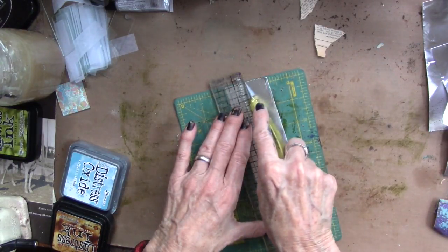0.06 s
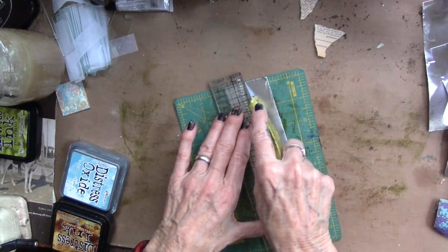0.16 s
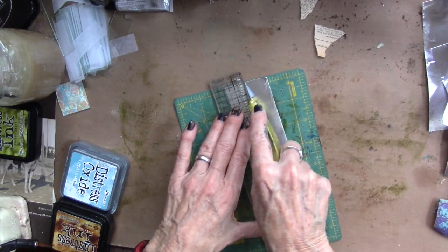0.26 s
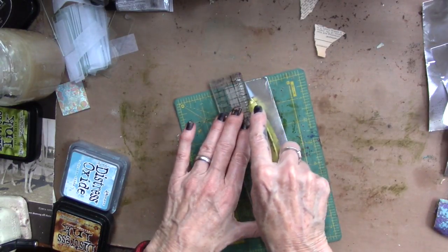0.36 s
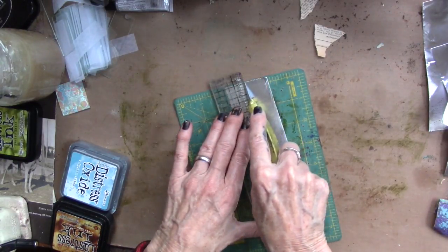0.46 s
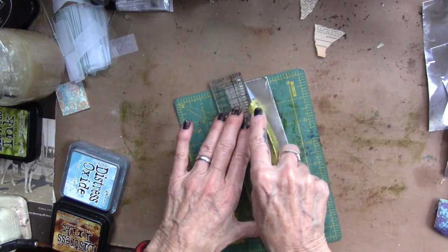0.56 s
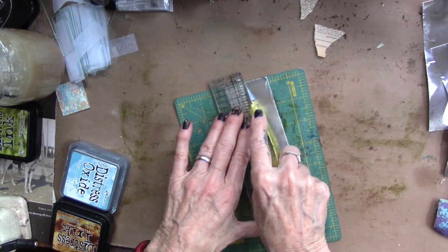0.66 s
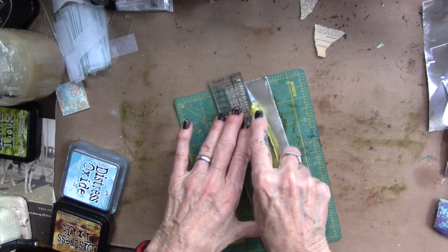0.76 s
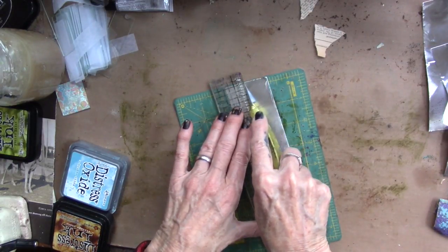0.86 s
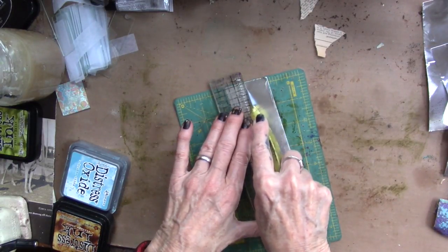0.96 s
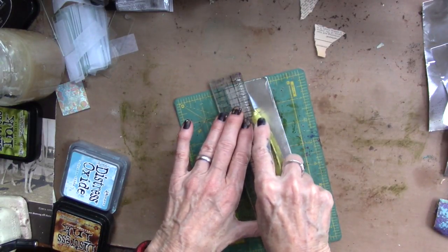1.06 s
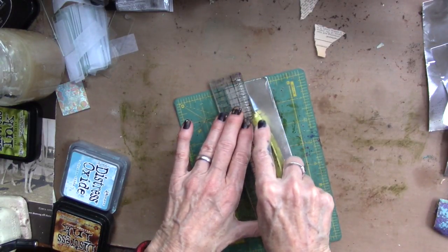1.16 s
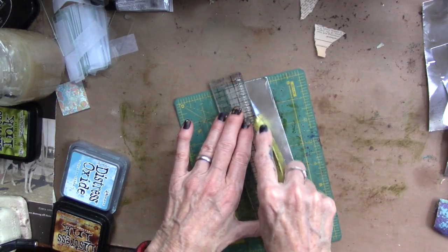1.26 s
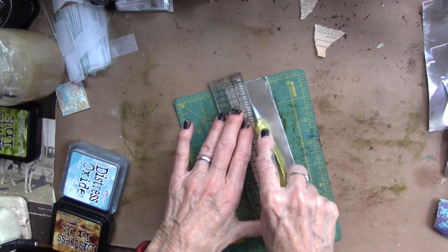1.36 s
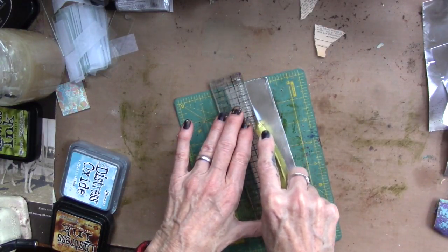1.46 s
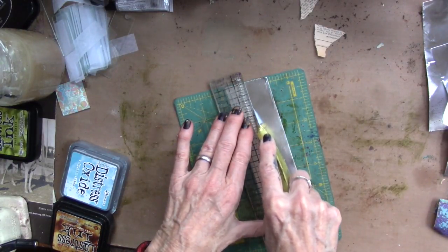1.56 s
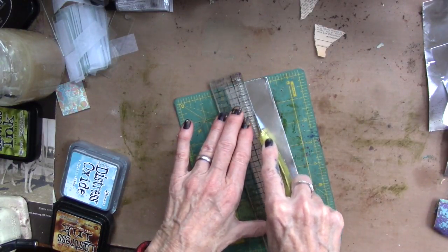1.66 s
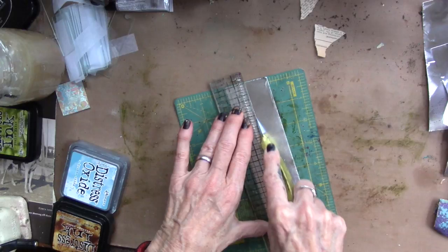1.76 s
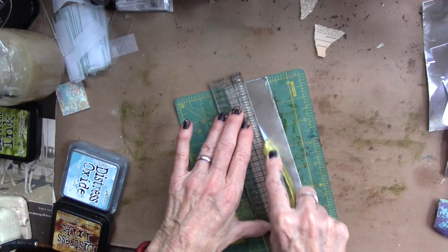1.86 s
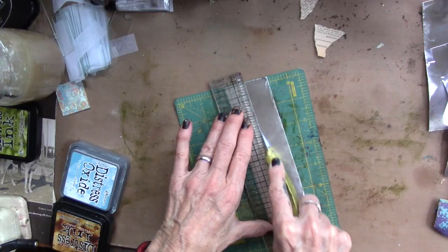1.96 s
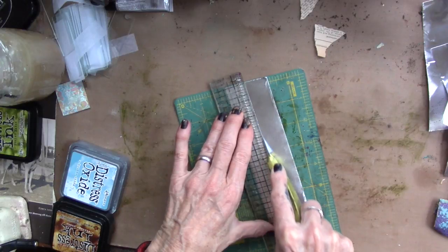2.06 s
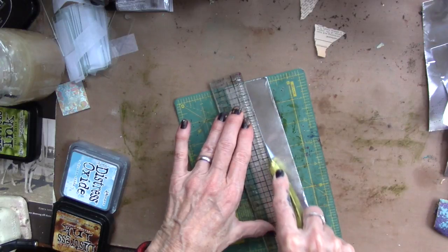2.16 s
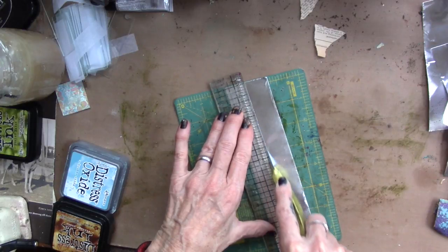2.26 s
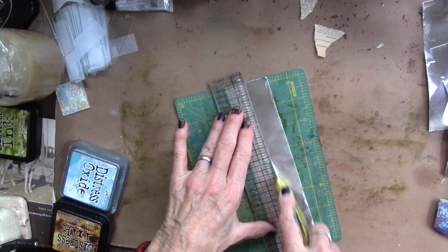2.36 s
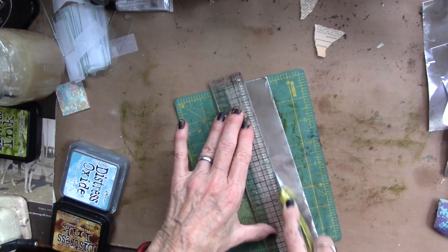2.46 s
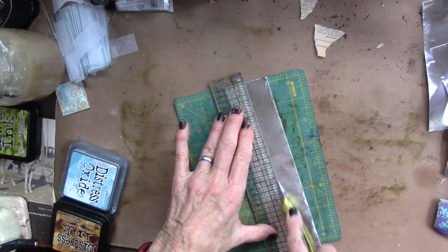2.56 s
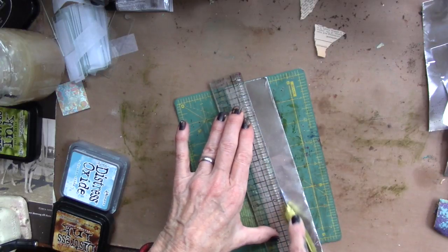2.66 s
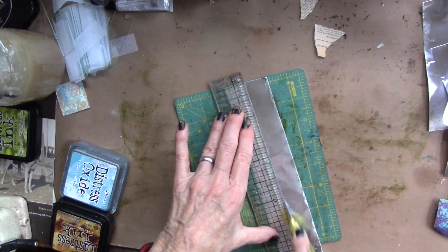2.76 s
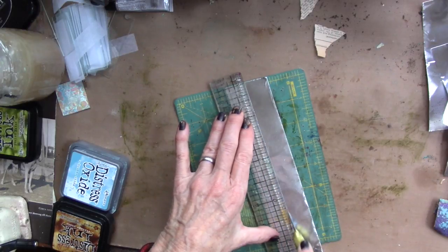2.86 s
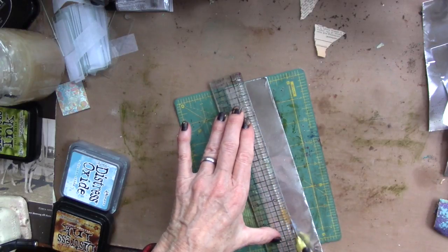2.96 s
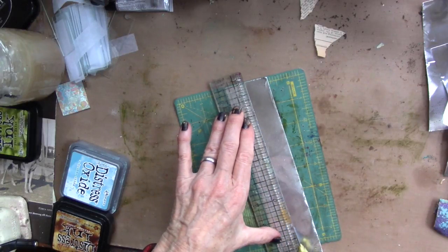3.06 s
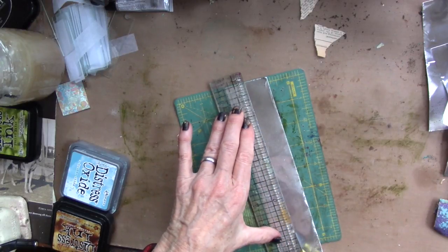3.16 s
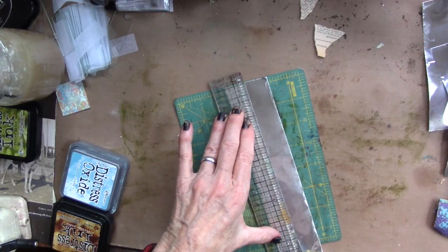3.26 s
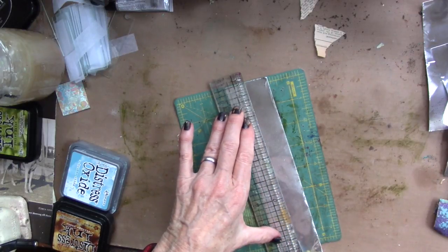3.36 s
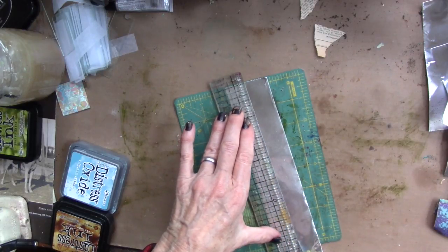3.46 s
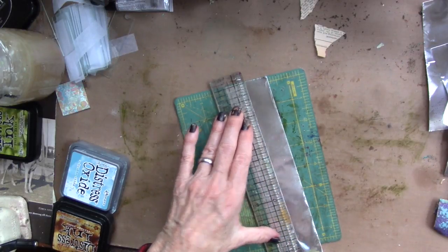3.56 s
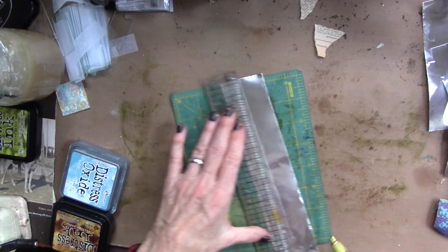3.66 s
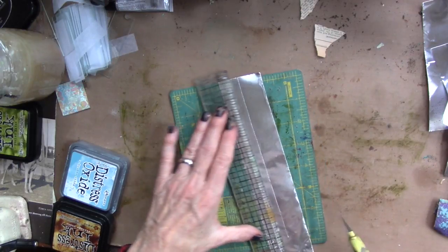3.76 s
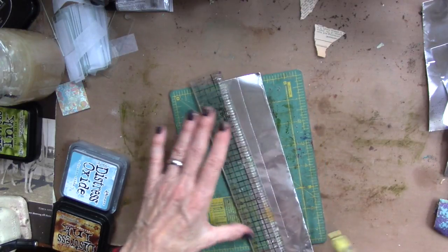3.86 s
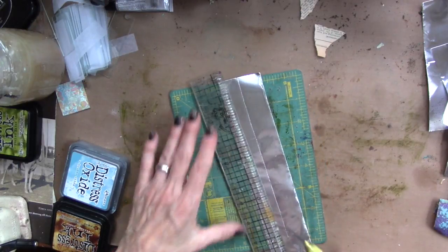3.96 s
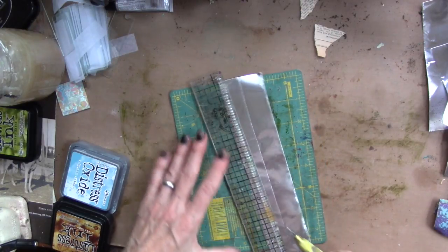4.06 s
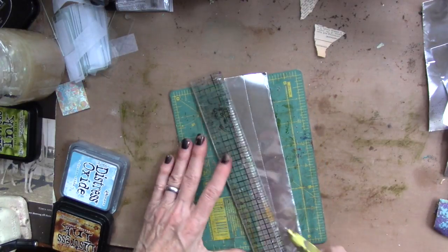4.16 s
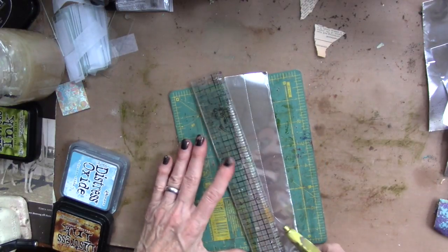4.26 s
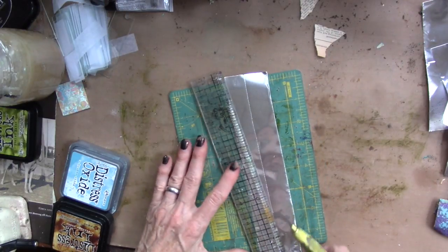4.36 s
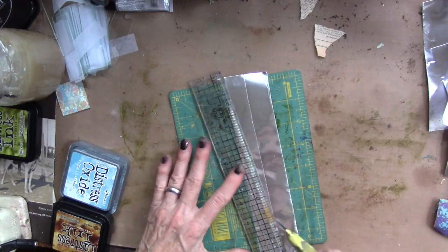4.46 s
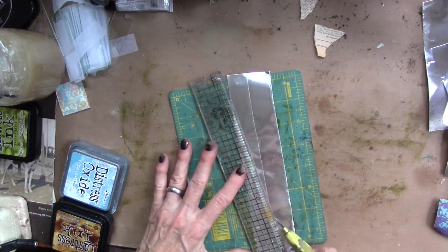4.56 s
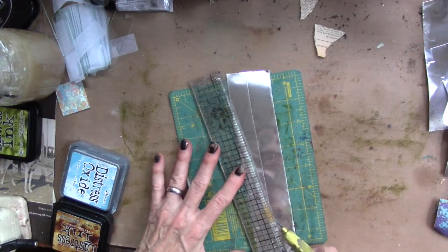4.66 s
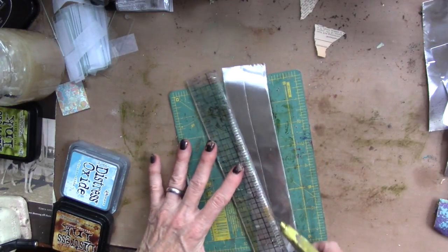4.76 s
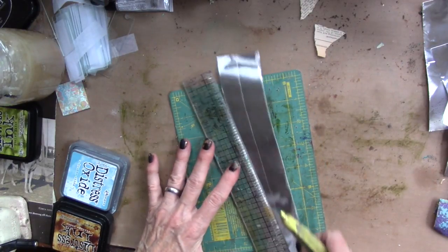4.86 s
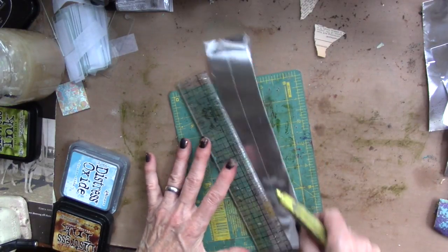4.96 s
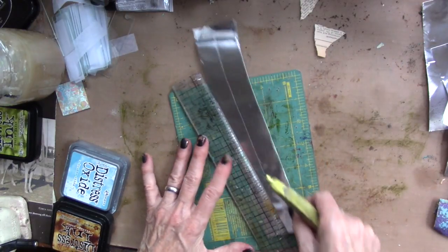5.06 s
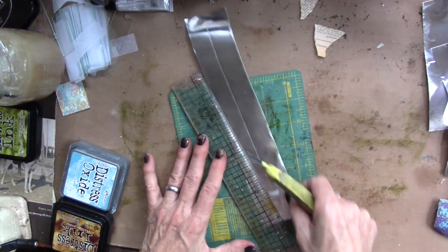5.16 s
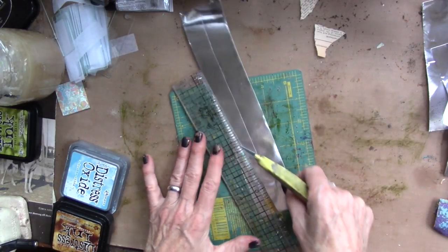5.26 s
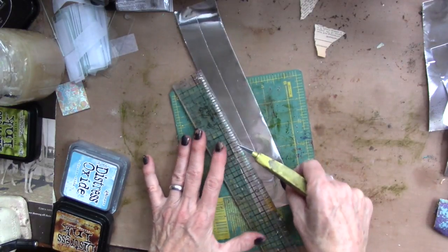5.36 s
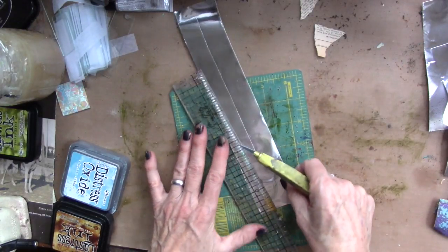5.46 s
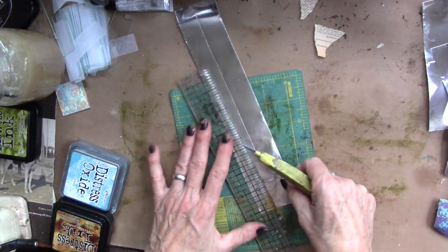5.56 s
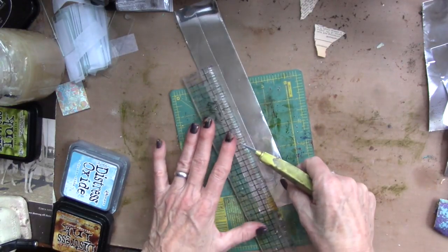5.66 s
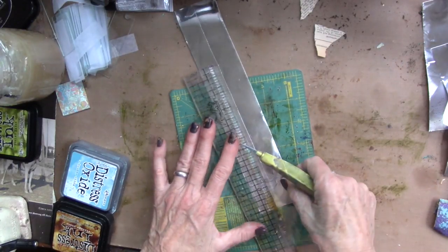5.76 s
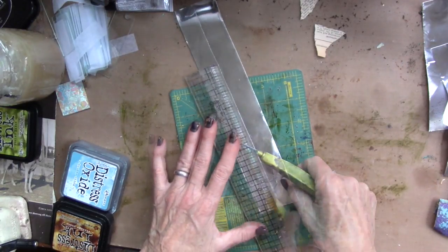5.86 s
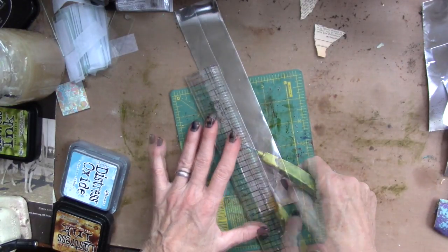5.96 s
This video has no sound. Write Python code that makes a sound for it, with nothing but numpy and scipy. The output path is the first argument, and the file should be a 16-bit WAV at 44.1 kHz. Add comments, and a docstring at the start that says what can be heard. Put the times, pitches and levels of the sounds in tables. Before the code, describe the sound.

Quiet, dry tabletop work heard closely indoors: brief scratchy tugs, then a woody, rasping knife stroke of under two seconds through foil tape, with a few blade catches. One hard, bright plastic crack stands far above everything. Broken rubs and clicks follow, then a dull tap, a tiny squeak and crisp foil popping and sizzling, ending in faint skids over gentle room hum.

```python
"""Knife, ruler and foil tape on a cutting mat

A small room, with the work under the microphone. A craft knife is drawn along a plastic ruler through
foil tape: random slips ring the mat, table and blade. The ruler comes unstuck with a sharp snap, a struck
set of resonances, and is slid aside as filtered friction. The knife tip knocks on the mat, and the cut strip
is peeled up in pops and crackle and pushed away. Room hum and a faint pulsing sine whine lie underneath."""
import sys
import numpy as np
from scipy import signal
from scipy.fft import rfft, irfft, next_fast_len
from scipy.io import wavfile
from scipy.ndimage import uniform_filter1d, map_coordinates

SR = 44100
rng = np.random.default_rng(int(sys.argv[2]) if len(sys.argv) > 2 else 0)


def int16_out(signal):
    """Quantize to a 16-bit WAV file."""
    q = np.round(np.clip(np.atleast_2d(signal).T, -1, 1) * 32767)
    wavfile.write(sys.argv[1], SR, q.astype(np.int16))


N = 265790  # length in samples

# Columns are named with their units. Levels are relative where a function trims or normalises them.
# The long knife stroke: [time_s, drag_on_mat_db, scrape_on_ruler_edge_db]
STROKE = [(1.42, -77, -78), (1.428, -62, -75), (1.48, -57, -74), (1.522, -49.5, -63), (1.788, -47.5, -62.5),
          (1.9, -45, -58), (2.028, -48.5, -62), (2.225, -45.5, -62), (2.25, -44, -59),
          (2.376, -45.5, -56.5), (2.636, -48.5, -58), (2.778, -47, -49.5), (2.958, -50, -58.5),
          (3.062, -49, -56), (3.115, -60, -81)]
# Short tugs before and after it: [middle_s, length_s, drag_on_mat_db, scrape_on_ruler_edge_db]
TUGS = [(0.588, 0.063, -57.5, -68), (1.006, 0.18, -50, -66), (1.12, 0.037, -60, -89),
        (1.274, 0.16, -47.5, -63), (3.179, 0.14, -49.5, -56.5)]
# The blade's way down the ruler: [time_s, position (0 far end to 1 near end)]
TRAVEL = [(1.6, 0.3), (2.2, 0.22), (2.45, 0.77), (2.9, 0.96)]
# The blade runs freely through the foil until it leaves the tape: start_s, length_s, level_db
SLICE = (2.24, 0.656, -61)
# Resonances of the mat at the far and near end, and of the blade: [pitch_hz, width_hz, level_db]
MAT_FAR_MODES = [(263, 71, 0), (522, 91, -1), (804, 55, 6.5), (1074, 63, -4), (1195, 65, 1),
                 (1335, 44, 3.5), (1449, 49, 1.5), (1554, 40, -12), (1754, 68, -2), (1857, 107, 0),
                 (2058, 134, -0.5), (2304, 92, -10), (2556, 63, -7), (2830, 130, -20), (3450, 300, -12.5)]
MAT_NEAR_MODES = [(115, 13, 0), (345, 130, -5), (617, 86, 0), (798, 84, 3.5), (962, 130, 1.5),
                  (1065, 73, 5), (1208, 45, 5.5), (1391, 91, 1), (1563, 35, 0.5), (1784, 76, -1.5),
                  (2047, 113, 0), (2330, 120, -6.5), (2838, 56, -8.5), (2930, 1600, -12)]
BLADE_MODES = [(6330, 1260, -1.5), (6750, 600, -2.5), (7700, 550, 0.5), (9900, 1500, -3.5)]
# Spectra of the mat drag, table rumble, ruler-edge scrape and parting foil: [frequency_hz, level_db]
DRAG_SPECTRUM = [(150, -32.5), (260, -6.5), (600, 3.5), (1300, -4), (2200, -4.5), (2750, -14.5),
                 (3700, -27), (4500, -22), (8000, -70)]
RUMBLE_SPECTRUM = [(30, -46.5), (58, -11), (85, -19), (120, -7.5), (165, -8.5), (260, -5), (370, -2.5),
                   (550, -16.5), (900, -85)]
EDGE_SPECTRUM = [(1470, -31), (2400, 5.5), (3200, -8), (3990, -1.5), (4500, -3.5), (5000, 0), (5660, -3.5),
                 (6500, -8), (7330, -14.5), (8300, -20), (9600, -15.5), (10800, -26), (17600, -120)]
PARTING_SPECTRUM = [(4500, -17), (6800, 2), (7400, -1), (8400, 2.5), (9700, -2), (10800, 0), (12100, -3.5),
                    (13300, -6.5), (14000, -11), (16000, -16)]
RUMBLE_FAR_DB, RUMBLE_NEAR_DB = -17, -5  # table rumble over the drag, at either end of the ruler
PARTING_DB = -10  # foil parting over the scrape
MAT_DRIFT, MAT_DRIFT_KNOTS_PER_S = 0.016, 9  # pitch wander as the pressure shifts (share of pitch)
HAND_FAR_S, HAND_NEAR_S, HAND_SHARE = 0.00062, 0.00051, 0.18  # echo lag at either end, and its gain
PATCH_DB, FOIL_PATCH_DB = 2.0, 1.3  # depth of the moving swells in the spectrum

# The ruler snaps free in two quick steps: [start_s, level_db]
SNAP = [(3.59665, -3.5), (3.597, -12)]
# Resonances of the plastic ruler: [pitch_hz, width_hz, level_db]
RULER_MODES = [(600, 500, -22), (1100, 500, -7), (2650, 520, 0.5), (3700, 500, -4), (4650, 480, 8.5),
               (6000, 560, 1), (8300, 520, 4), (9900, 770, 5)]
# The snap's lean to the left: [frequency_hz, left_up_and_right_down_db]
LEAN = [(1000, -0.5), (5000, 0.5), (9000, .7)]
# Shoves of the ruler over the mat: [start_s, rise_s, length_s, rub_db, hiss_db]
SHOVES = [(3.637, .005, 0.053, -49, -49), (3.713, 0.016, 0.11, -64, -53), (3.869, .015, 0.023, -82, -64.5),
          (3.948, 0.0035, 0.0057, -49, -54.5), (3.989, 0.022, 0.028, -55, -59.5),
          (4.06, 0.0045, 0.099, -54, -48), (4.17, 0.011, 0.071, -58.5, -62.5),
          (4.287, 0.0065, 0.054, -59, -60), (4.402, 0.041, 0.071, -57.5, -61),
          (4.469, 0.024, 0.042, -53.5, -50.5), (4.61, 0.069, 0.31, -55, -58.5)]
# Spectra of the ruler's rub and hiss and of the bright noise around the snap: [frequency_hz, level_db]
RUB_SPECTRUM = [(180, -26), (300, 5.5), (396, -20), (565, -3.5), (776, -3.5), (1310, 1.5), (3200, -5.5),
                (4160, -45), (7040, -120)]
HISS_SPECTRUM = [(1470, -53), (2500, -5), (3570, 0.5), (4020, -6), (5070, 0), (5970, -0.5), (7590, -9),
                 (10400, -6.5), (11700, -13.5), (13300, -16), (16000, -28)]
BRIGHT_SPECTRUM = [(180, -27), (300, -7), (870, -6.5), (1460, -3), (2650, -1), (4370, -3.5), (5500, 0.5),
                   (8790, -9), (10600, -8.5), (13500, -20), (16000, -22)]
SHOVE_SAG_DB_PER_S, SHOVE_RELEASE_S = 21, 0.033
# Bright noise rises fast into the snap and fades after it
BRIGHT_DB, BRIGHT_RISE_DB_PER_S, BRIGHT_FALL_DB_PER_S = -33.5, 690, 250
BRIGHT_LEAD_DB = -1.5  # end of the rise, against the start of the fade

# The strip peels off in two pulls, then comes free: [time_s, crackle_db, sizzle_db]
PEEL = [(4.66, -64, -77), (4.71, -48, -62), (4.785, -51.5, -63), (4.836, -45.5, -51.5), (4.906, -42, -52.5),
        (4.958, -46, -55), (5.01, -40.5, -53), (5.09, -44, -55.5), (5.22, -45, -59.5), (5.275, -47.5, -60),
        (5.316, -49, -59), (5.35, -50.5, -63), (5.385, -65, -78), (5.42, -72, -81)]
# Later nudges of the strip: [start_s, length_s, level_db]
NUDGES = [(5.488, .14, -46), (5.802, 0.024, -56.5), (5.924, 0.12, -60.5)]
# Spectra of the foil's crackle, sizzle and skid: [frequency_hz, level_db]
FOIL_SPECTRUM = [(240, -42), (330, -7), (450, -17), (630, -15.5), (820, -11.5), (1400, -3), (1900, -8),
                 (2350, -1), (3300, -2.5), (3900, -5.5), (4500, -10), (5200, -6.5), (6000, -8), (6700, -6),
                 (7500, -11.5), (9000, -15), (11700, -46), (16000, -90)]
SIZZLE_SPECTRUM = [(4120, -9.5), (7000, -11), (7740, -0.5), (9400, 0.5), (10400, 1.5), (11200, -3.5),
                   (13000, -7), (15000, -11), (16000, -14)]
SKID_SPECTRUM = [(530, -22), (900, -12.5), (1070, -8.5), (1480, -12.5), (1740, -10), (2450, -15),
                 (3030, -13.5), (4000, -17.5), (4500, -23), (5000, -17), (6820, -19), (8000, -26.5),
                 (15000, -39)]
NUDGE_RISE_S, NUDGE_SAG_DB_PER_S, NUDGE_RELEASE_S = 0.03, 33, 0.025
# Creases pop as the foil flexes, and finer wrinkles tick in the sizzle; OCTAVES is the spread either way
CREASES_PER_S, CREASE_HZ, CREASE_OCTAVES, CREASE_T60_S, CREASE_DB = 600, 3300, 1.1, 0.019, -6.5
WRINKLES_PER_S, WRINKLE_HZ, WRINKLE_OCTAVES, WRINKLE_T60_S, WRINKLE_DB = 900, 10000, 0.6, 0.004, -3

# Foil strip and ruler gripping the mat, one table for each squeak: [time_s, pitch_hz, level_db]
SQUEAKS = [
    [(4.739, 1800, -60), (4.742, 1557, -44), (4.747, 1273, -45.5), (4.753, 1220, -42.5),
     (4.761, 1280, -45.5), (4.767, 1500, -45), (4.773, 1600, -62)],
    [(5.505, 1650, -64), (5.528, 1770, -50), (5.558, 1740, -49), (5.572, 1760, -45.5), (5.592, 1800, -46.5),
     (5.648, 1720, -63)],
    [(5.754, 820, -66), (5.758, 850, -54), (5.772, 890, -58), (5.792, 800, -66)],
]
# Roughness of each squeak: jitter (share of its pitch)
SQUEAK_JITTERS = [.25, .075, .17]
SQUEAK_KNOTS_PER_S, SQUEAK_FLUTTER_DB, SQUEAK_OCTAVE_DB = 520, 2.5, -16
# Short swells of band noise, each around one pitch: [middle_s, length_s, pitch_hz, width_hz, level_db]
BAND_SWELLS = [(0.995, 0.15, 3420, 220, -64.5), (1.259, .1, 3410, 220, -69), (1.275, .08, 6650, 900, -66.5),
               (1.6, .12, 3420, 240, -67), (1.88, 0.058, 6400, 800, -64), (1.95, 0.092, 9600, 600, -72),
               (2.31, .06, 8200, 900, -64), (2.438, 0.062, 5500, 900, -60), (2.599, .16, 12200, 900, -69),
               (2.82, 0.089, 9600, 900, -68), (3.173, 0.047, 8600, 700, -73), (3.18, .06, 13600, 1090, -71),
               (3.643, 0.012, 1550, 750, -45), (3.692, 0.032, 1600, 400, -56),
               (3.798, 0.034, 1480, 650, -55), (3.811, 0.013, 3500, 500, -56),
               (3.832, 0.0083, 3200, 600, -54), (3.957, 0.0031, 1830, 900, -49),
               (4.004, 0.026, 2450, 600, -57.5), (4.066, .009, 6000, 1500, -54),
               (4.101, .05, 3500, 750, -52.5), (4.152, 0.011, 3100, 1500, -50),
               (4.313, .025, 2600, 500, -65), (4.498, 0.022, 3500, 700, -52),
               (4.602, 0.004, 1670, 600, -49.5), (4.753, 0.006, 2100, 1000, -46),
               (4.913, 0.023, 2900, 1200, -47), (5.035, .02, 2480, 700, -50), (5.197, .04, 2330, 500, -49),
               (5.076, 0.0088, 1400, 700, -46.5), (5.098, .005, 2900, 900, -41.5),
               (5.295, 0.025, 5670, 1200, -46), (5.573, 0.059, 1800, 450, -53),
               (5.632, 0.013, 3360, 1210, -54.5), (5.832, 0.044, 1820, 500, -62.5)]
# Small ticks of foil and ruler: [start_s, level_db, ring_hz]
TICKS = [(2.269, -35, 7600), (2.3106, -41, 6700), (2.736, -42, 11000), (2.882, -35.5, 10000),
         (2.886, -45, 4820), (3.58, -38, 5700), (3.599, -18, 6400), (3.6072, -21, 5300),
         (3.6132, -26, 2100), (3.64, -28, 5800), (3.9485, -32.5, 4700), (3.949, -35.5, 10700),
         (3.974, -34.5, 5270), (4.0636, -32, 6430), (4.1553, -27.5, 4630), (4.248, -40, 10500),
         (4.26, -31.5, 10800), (4.2597, -39, 5540), (4.84, -36, 3300), (4.896, -23, 5020),
         (5.1316, -24, 10700), (5.173, -25, 7200), (5.222, -28.5, 2880), (5.291, -24, 5400),
         (5.2942, -20, 5460), (5.333, -39, 11300)]
TICK_REACH_HZ = 5000  # how far above its ring a tick still sounds
TICK_SNAP_HZ, TICK_SNAP_DB = 10000, -17  # bright edge of a tick against its ring, before softening
# The blade catches or knocks on the mat: [start_s, level_db]
KNOCKS = [(1.861, -36), (1.88, -31.5), (1.888, -27), (2.178, -29), (2.187, -37), (2.251, -23), (2.27, -26),
          (2.312, -27), (2.336, -33), (2.893, -34), (3.954, -39), (4.155, -32), (4.595, -39), (5.758, -39)]
# The knife tip lands, thumps the table and bounces: [start_s, thump_db, click_db]
LANDING = [(4.6985, -25, -30), (4.7029, -34, -45), (4.7073, -31.5, -53), (4.7177, -36, -55)]
# Resonances of the table under the knife tip: [pitch_hz, width_hz, level_db]
TABLE_MODES = [(276, 65, 2.5), (390, 90, -4), (580, 70, -2), (746, 92, -9), (1010, 83, -6.5),
               (1750, 140, -10), (2140, 120, -18), (2900, 77, -4), (3500, 240, -25)]

# How long the walls ring: [frequency_hz, t60_s]
WALLS = [(150, 0.98), (1000, 0.069), (5000, 0.32), (14000, 0.21)]
# Left-right likeness of diffuse sound: [frequency_hz, correlation (0 to 1)]
ALIKE = [(30, 0.56), (120, 0.83), (400, 0.62), (1000, 0.7), (3000, 0.98), (6000, 0.99), (12000, 1)]
# Spectrum of the room hum: [frequency_hz, level_db]
HUM_SPECTRUM = [(15, -52.5), (25, -35.5), (49, -13.5), (84, -8.5), (123, -5.5), (190, -2.5), (223, -2),
                (249, -0.5), (516, -3), (607, -6.5), (840, -8), (3520, -19.5), (5570, -22), (6560, -23.5),
                (16000, -34)]
# The whine sounds in short runs: [start_s, length_s]
WHINE_RUNS = [(0.32, .38), (0.991, .36), (1.665, .1), (3.135, .22), (4.582, .1), (5.718, .23)]
WHINE_PERIOD_S, WHINE_PULSE_S, WHINE_DB = 0.135, 0.07, -73
TOP_HZ = 15700  # band limit


def amp(db):
    """Decibels to gain."""
    return 10 ** (np.asarray(db) / 20)


def unit(x):
    """Scale to rms 1."""
    return x / np.sqrt(np.mean(x ** 2) + 1e-20)


def crest(x):
    """Scale to peak 1."""
    return x / np.abs(x).max()


def along(points, hz):
    """Read (frequency, value) points on a log frequency axis."""
    f, v = np.transpose(points)
    return np.interp(np.log(hz + 1), np.log(f + 1), v)


def gains(rows):
    """One gain per sample for each dB column, at -120 dB outside the rows."""
    s, *cols = np.transpose(rows)
    return [amp(np.interp(np.arange(N) / SR, s, c, left=-120, right=-120)) for c in cols]


def wobble(rate):
    """A smooth random curve, rate knots a second."""
    knots = rng.standard_normal(int(N * rate / SR) + 4)
    return map_coordinates(knots, [np.arange(N) * rate / SR])


def swell(s, length):
    """A smooth rise and fall around time s."""
    return np.exp(-np.pi * ((np.arange(N) / SR - s) / length) ** 2)


def push(s, rise, length, sag_db_per_s, release):
    """One movement of the hand: it rises, sags while it lasts, then dies away."""
    t = np.maximum(np.arange(N) / SR - s, 0)
    sag = amp(-sag_db_per_s * np.minimum(t, length))
    return np.minimum(t / rise, 1) * sag * np.exp(-np.maximum(t - length, 0) / release)


def filtered(x, response):
    """Multiply the spectrum of x by a response of frequency, real or complex."""
    n = x.shape[-1]
    m = next_fast_len(n + 8192)
    return irfft(rfft(x, m) * response(np.fft.rfftfreq(m, 1 / SR)), m)[..., :n]


def coloured(x, spectrum):
    """Shape x by the given spectrum, at rms 1."""
    return unit(filtered(x, lambda hz: amp(along(spectrum, hz))))


def rung(x, modes, soft_hz=11500, order=1):
    """Play x through resonances (order 2: steeper skirts), then soften the top."""
    def body(f):
        return sum(amp(db) * (1j * f * w / (c * c - f * f + 1j * f * w)) ** order for c, w, db in modes)
    soft = signal.butter(4, soft_hz, fs=SR, output="sos")
    return signal.sosfilt(soft, filtered(x, body))


def add(track, s, sound):
    """Mix a sound into the track at time s."""
    part = track[round(s * SR):][:len(sound)]
    part += sound[:len(part)]


def burst(t60):
    """A quickly dying puff of contact noise."""
    t = np.arange(SR // 8) / SR
    return rng.standard_normal(len(t)) * amp(-60 * t / t60)


def slips(rate, scatter_db, clump_db, clump_rate):
    """Friction: tiny slips at random times and of random size, their level swelling in clumps."""
    hits = rng.random(N) < rate / SR
    size = rng.standard_normal(N) * amp(scatter_db * np.clip(rng.standard_normal(N), -2, 2))
    return unit(hits * size * amp(clump_db * wobble(clump_rate)))


def shifting(x, depth_db, size=5):
    """Bands swell and fade as the contact point moves; the result has rms 1."""
    z = signal.stft(x, nperseg=512)[2]
    field = uniform_filter1d(rng.standard_normal(z.shape), size=size, axis=0)  # smooth over frequency
    field = uniform_filter1d(field, size=24, axis=1)  # and over time
    return unit(signal.istft(z * amp(depth_db * unit(field)), nperseg=512)[1][:N])


def drifting(x):
    """The pitch of a ringing body wanders slightly, by an uneven reading clock."""
    clock = np.cumsum(1 + MAT_DRIFT * wobble(MAT_DRIFT_KNOTS_PER_S))
    return unit(map_coordinates(x, [clock], mode="reflect"))


def creases(rate, centre_hz, octaves, t60, scatter_db):
    """Small folds pop at random as dying sines, each with its own pitch and size; rms 1."""
    out, t = np.zeros(N), np.arange(SR // 48) / SR
    for when, pitch, size in rng.random((int(rate * N / SR), 3)):
        hz = centre_hz * 2 ** (octaves * (2 * pitch - 1))
        add(out, when * N / SR, amp(scatter_db * size ** 2 - 60 * t / t60) * np.sin(2 * np.pi * hz * t))
    return unit(out)


def spread(pair):
    """Two unrelated signals become left and right of a diffuse field."""
    def mix(hz):
        turn = np.arccos(np.clip(along(ALIKE, hz), -1, 1)) / 2
        return np.array([np.cos(turn), np.sin(turn)])
    mid, side = filtered(pair, mix)
    return np.array([mid + side, mid - side])


def knife():
    """The blade ploughs the mat and rings it, shakes the table, scrapes the ruler and parts the foil."""
    drag, edge = gains(STROKE)
    for s, length, drag_db, edge_db in TUGS:
        drag = drag + amp(drag_db) * swell(s, length)
        edge = edge + amp(edge_db) * swell(s, length)
    travel = np.clip(np.interp(np.arange(N) / SR, *np.transpose(TRAVEL)), 0, 1)
    far, near = np.sqrt(1 - travel), np.sqrt(travel)
    rumble = drag * amp(RUMBLE_FAR_DB + (RUMBLE_NEAR_DB - RUMBLE_FAR_DB) * travel)
    s, length, db = SLICE
    free_run = amp(db) * push(s, rise=0.15, length=length, sag_db_per_s=0.5, release=0.0069)
    parting = np.hypot(amp(PARTING_DB) * edge, free_run)

    # other resonances answer as the blade moves along the mat
    plough = slips(rate=5000, scatter_db=1.5, clump_db=1.0, clump_rate=76)
    ring = far * unit(rung(plough, MAT_FAR_MODES, soft_hz=4160, order=2))
    plough = slips(rate=5500, scatter_db=3.0, clump_db=1.0, clump_rate=70)
    ring += near * unit(rung(plough, MAT_NEAR_MODES, soft_hz=4160, order=2))
    rasp = coloured(slips(rate=5000, scatter_db=5.5, clump_db=1.0, clump_rate=81), DRAG_SPECTRUM)
    body = unit(shifting(drifting(ring), depth_db=2.0, size=3) + amp(-7) * rasp)
    table = coloured(slips(rate=2600, scatter_db=1.5, clump_db=1.0, clump_rate=35), RUMBLE_SPECTRUM)

    # at the far end the blade rings, at the near end the ruler's edge is heard
    grit = slips(rate=5500, scatter_db=0.0, clump_db=1.1, clump_rate=66)
    blade = amp(-3.5) * far * unit(rung(grit, BLADE_MODES, order=2))
    scrape = shifting(blade + near * coloured(grit, EDGE_SPECTRUM), depth_db=PATCH_DB, size=4)
    tear = coloured(slips(rate=6400, scatter_db=0.0, clump_db=1.8, clump_rate=47), PARTING_SPECTRUM)
    tear = shifting(tear, depth_db=PATCH_DB, size=4)
    treble = off_hand(amp(-1) * edge * scrape + parting * tear, travel)
    return amp(0.12) * drag * body + rumble * table + treble


def off_hand(x, travel):
    """A close echo off the moving hand combs the scrape with gliding ridges."""
    lag = HAND_FAR_S + (HAND_NEAR_S - HAND_FAR_S) * travel
    return x + HAND_SHARE * map_coordinates(x, [np.arange(N) - lag * SR])


def snap():
    """Two quick blows ring the plastic ruler, each with a brief noisy rattle against the mat."""
    out = np.zeros(N)
    click = crest(rung(signal.unit_impulse(SR // 8), RULER_MODES, soft_hz=11000))
    rattle = crest(rung(burst(t60=0.012), RULER_MODES, soft_hz=9000))
    for s, db in SNAP:
        add(out, s, amp(db) * (click + amp(-19) * rattle))
    return out


def ruler():
    """Bright noise rises fast into the snap and fades after it; the ruler rubs and hisses over the mat."""
    rub, hiss = np.zeros((2, N))
    for s, rise, length, rub_db, hiss_db in SHOVES:
        shove = push(s, rise, length, SHOVE_SAG_DB_PER_S, SHOVE_RELEASE_S)
        rub = rub + amp(rub_db) * shove
        hiss = hiss + amp(hiss_db) * shove
    t = np.arange(N) / SR - SNAP[0][0]  # time from the snap
    course_db = np.where(t < 0, BRIGHT_LEAD_DB + BRIGHT_RISE_DB_PER_S * t, -BRIGHT_FALL_DB_PER_S * t)
    bright = amp(BRIGHT_DB + course_db)
    rubbing = coloured(slips(rate=4000, scatter_db=0.0, clump_db=1.8, clump_rate=85), RUB_SPECTRUM)
    hissing = coloured(slips(rate=10000, scatter_db=1.5, clump_db=1.4, clump_rate=46), HISS_SPECTRUM)
    noise = coloured(slips(rate=17000, scatter_db=-0.5, clump_db=2.5, clump_rate=210), BRIGHT_SPECTRUM)
    return amp(-1.5) * rub * rubbing + hiss * shifting(hissing, depth_db=0.5) + bright * noise


def foil():
    """The strip crackles and its creases pop as it lifts, and it skids when it is pushed on."""
    crackle, sizzle = gains(PEEL)
    nudge = np.zeros(N)
    for s, length, db in NUDGES:
        nudge += amp(db) * push(s, NUDGE_RISE_S, length, NUDGE_SAG_DB_PER_S, NUDGE_RELEASE_S)
    crinkle = coloured(slips(rate=8200, scatter_db=0.0, clump_db=0.94, clump_rate=99), FOIL_SPECTRUM)
    fizz = coloured(slips(rate=6400, scatter_db=-0.5, clump_db=1.0, clump_rate=90), SIZZLE_SPECTRUM)
    skid = coloured(slips(rate=9400, scatter_db=2.0, clump_db=2.0, clump_rate=210), SKID_SPECTRUM)
    pops = creases(CREASES_PER_S, CREASE_HZ, CREASE_OCTAVES, CREASE_T60_S, scatter_db=11)
    wrinkles = creases(WRINKLES_PER_S, WRINKLE_HZ, WRINKLE_OCTAVES, WRINKLE_T60_S, scatter_db=6)
    wrinkles = coloured(wrinkles, SIZZLE_SPECTRUM)
    rustle = unit(shifting(crinkle, depth_db=FOIL_PATCH_DB) + amp(CREASE_DB) * pops)
    glitter = unit(shifting(fizz, depth_db=FOIL_PATCH_DB) + amp(WRINKLE_DB) * wrinkles)
    return crackle * rustle + sizzle * glitter + nudge * skid


def squeaks():
    """An edge grips the mat: a tone and its octave glide with the push at an unsteady rate."""
    out, t = np.zeros(N), np.arange(N) / SR
    for rows, jitter in zip(SQUEAKS, SQUEAK_JITTERS):
        s, hz, db = np.transpose(rows)
        rate = np.interp(t, s, hz) * (1 + jitter * wobble(SQUEAK_KNOTS_PER_S))
        phase = 2 * np.pi * np.cumsum(rate) / SR
        flutter = SQUEAK_FLUTTER_DB * wobble(SQUEAK_KNOTS_PER_S)
        level = amp(np.interp(t, s, db, left=-120, right=-120) + flutter)
        out += level * unit(np.sin(phase) + amp(SQUEAK_OCTAVE_DB) * np.sin(2 * phase))
    return out


def band_swells():
    """Short swells of band noise, each around one pitch: noise through a single broad resonance."""
    out, t = np.zeros(N), np.arange(SR // 2) / SR
    middle = t.mean()
    for s, length, hz, width_hz, db in BAND_SWELLS:
        shape = np.exp(-2 * ((t - middle) / length) ** 2)
        band = unit(rung(rng.standard_normal(len(t)), [(hz, width_hz, 0)], order=2))
        add(out, s - middle, amp(db) * shape * band)
    return out


def contacts(tick_width_hz=1100):
    """Contact bursts ring as foil and ruler ticks, blade catches, and the knife tip landing."""
    out = np.zeros(N)
    for s, db, hz in TICKS:
        modes = [(hz, tick_width_hz, 0), (TICK_SNAP_HZ, 3000, TICK_SNAP_DB)]
        tick = crest(rung(burst(t60=0.0093), modes, soft_hz=min(hz + TICK_REACH_HZ, 14000)))
        add(out, s, amp(db - 5.5) * tick)
    for s, db in KNOCKS:
        knock = crest(rung(burst(t60=0.016), MAT_FAR_MODES, soft_hz=3800))
        add(out, s, amp(db - 10.5) * knock)
    for s, thump_db, click_db in LANDING:
        thump = crest(rung(signal.unit_impulse(SR // 8), TABLE_MODES, soft_hz=3270))
        click = crest(rung(burst(t60=0.014), [(6050, 420, 7), (8150, 680, 0)]))
        add(out, s, amp(thump_db) * thump)
        add(out, s, amp(click_db) * click)
    return out


def room(x):
    """The walls answer with a diffuse noise tail, each frequency dying at its own speed."""
    hz, t, z = signal.stft(rng.standard_normal((2, SR // 2)), SR, nperseg=256)
    decay = amp(-60 * t / along(WALLS, hz)[:, None])
    tail = spread(signal.istft(z * decay, SR, nperseg=256)[1])
    late = np.pad(x, (130, 0))[None]  # the walls answer 130 samples later
    return signal.fftconvolve(late, tail / np.linalg.norm(tail[0]), axes=1)[:, :N]


def background(whine_hz=5561):
    """Steady diffuse hum of shaped noise, and a thin, evenly pulsing sine whine that comes and goes."""
    hum = unit(spread(coloured(rng.standard_normal((2, N)), HUM_SPECTRUM)))
    t = np.arange(N) / SR
    on = np.zeros(N)
    for s, length in WHINE_RUNS:
        on += (t > s) * (t < s + length) * ((t - s) % WHINE_PERIOD_S < WHINE_PULSE_S)
    pulses = uniform_filter1d(on, size=300)  # soft edges
    whine = pulses * np.sqrt(2) * np.sin(2 * np.pi * whine_hz * t)
    return amp(-58.0) * hum + amp(WHINE_DB) * whine


def scene():
    """Everything happens under the microphone; the snap's treble comes from slightly left."""
    work = knife() + ruler() + foil() + band_swells() + squeaks() + contacts()
    crack = snap()
    placed = filtered(crack, lambda hz: amp(np.outer([1, -1], along(LEAN, hz))))
    return work + placed + amp(-25.0) * room(work + crack) + background()


def record(dry):
    """The recorder cuts off very steeply above its band limit."""
    return filtered(dry, lambda hz: 1 / np.sqrt(1 + (hz / TOP_HZ) ** 120))


dry = scene()
out = record(dry)
int16_out(out)
```